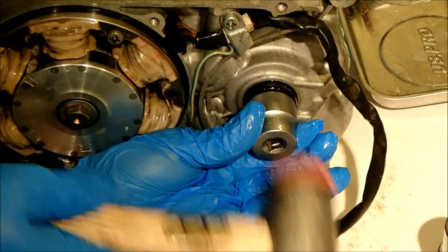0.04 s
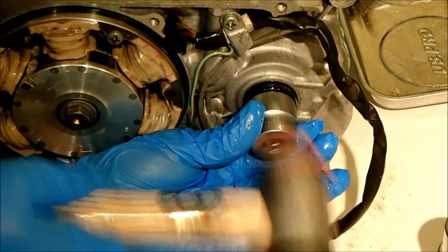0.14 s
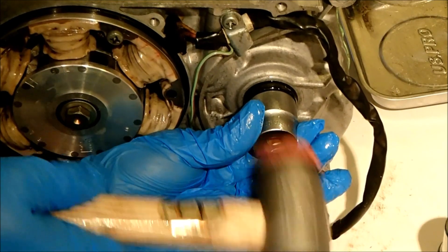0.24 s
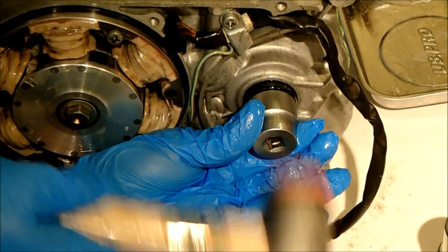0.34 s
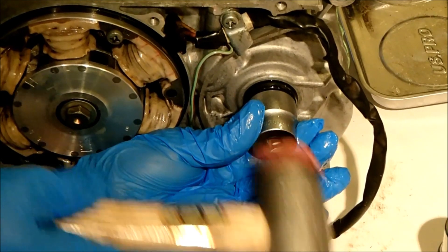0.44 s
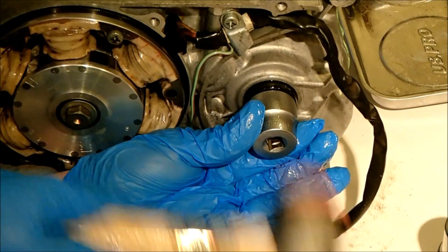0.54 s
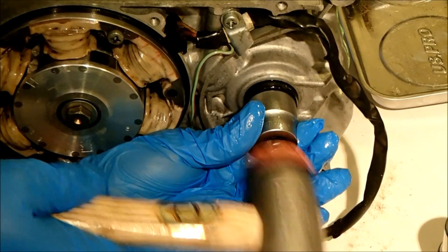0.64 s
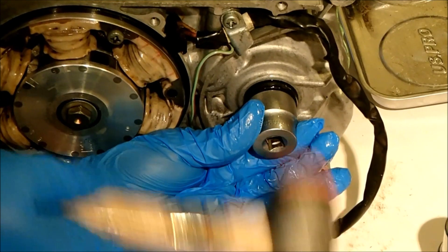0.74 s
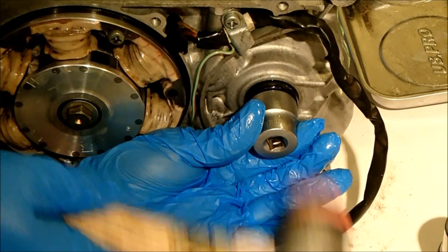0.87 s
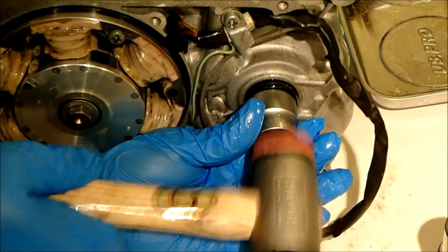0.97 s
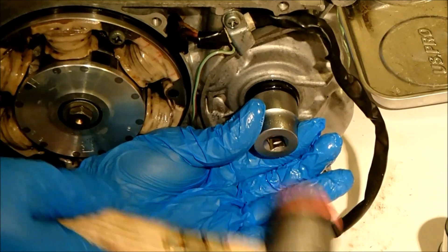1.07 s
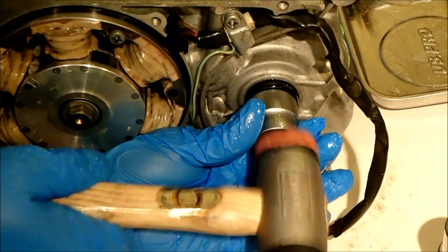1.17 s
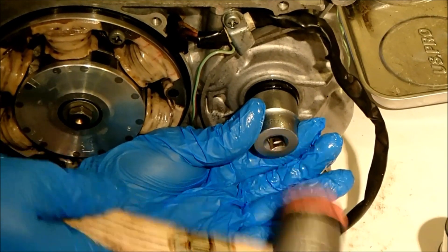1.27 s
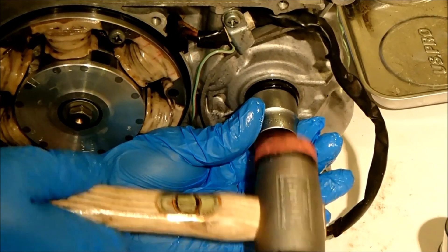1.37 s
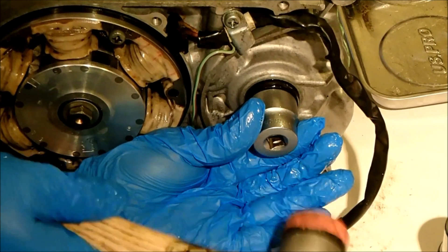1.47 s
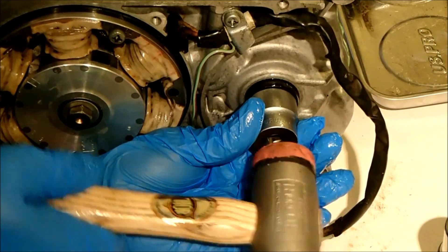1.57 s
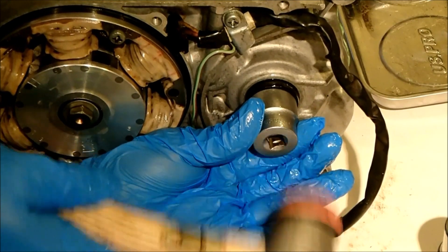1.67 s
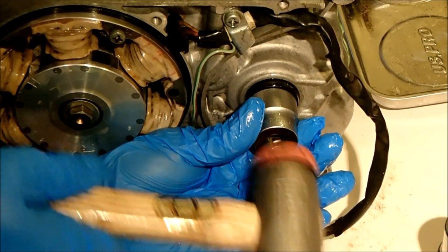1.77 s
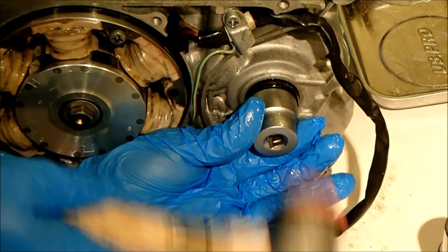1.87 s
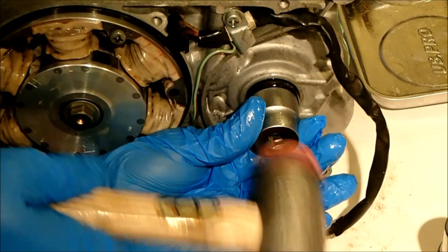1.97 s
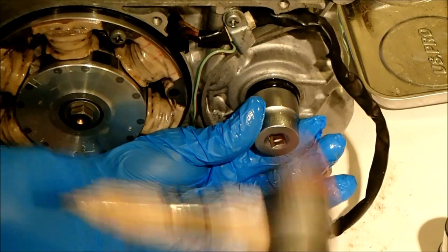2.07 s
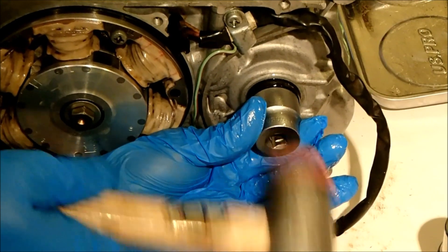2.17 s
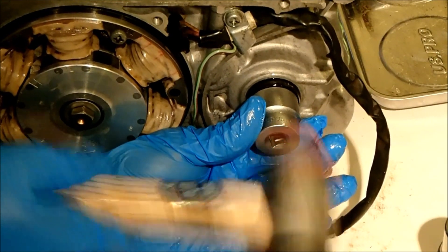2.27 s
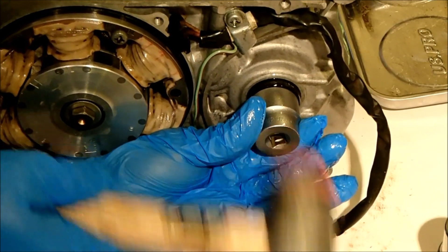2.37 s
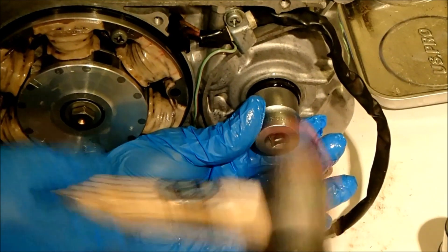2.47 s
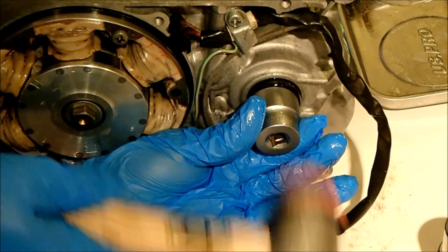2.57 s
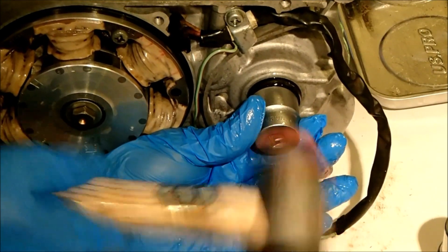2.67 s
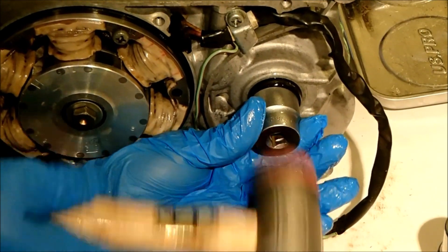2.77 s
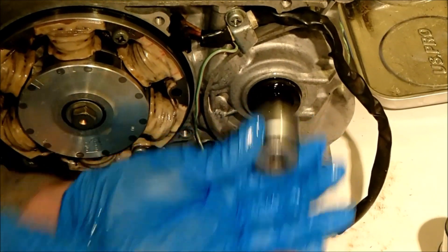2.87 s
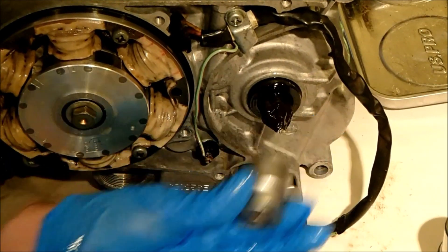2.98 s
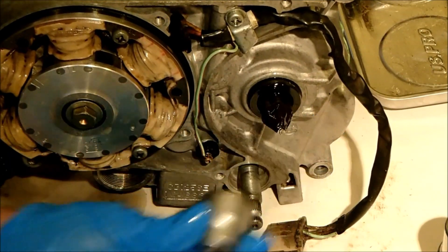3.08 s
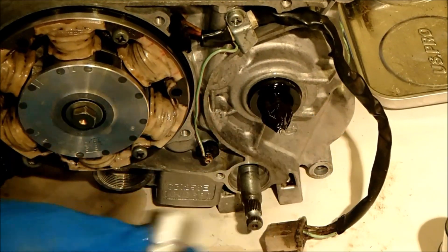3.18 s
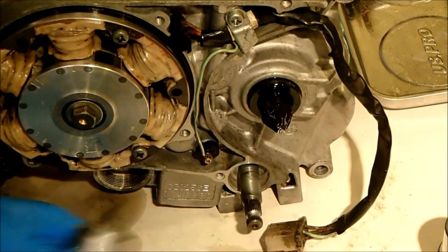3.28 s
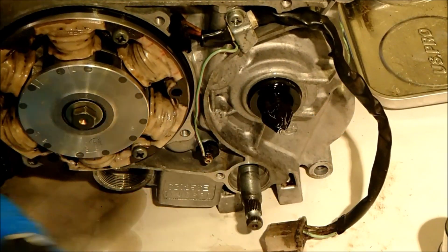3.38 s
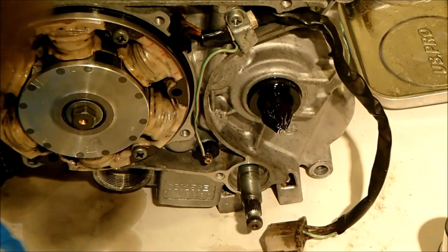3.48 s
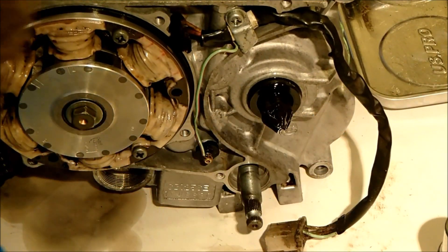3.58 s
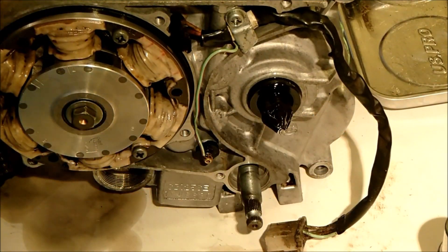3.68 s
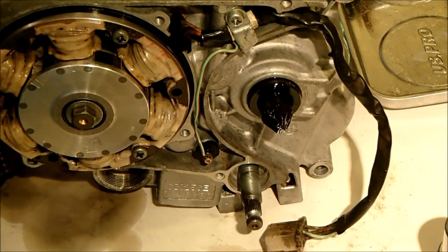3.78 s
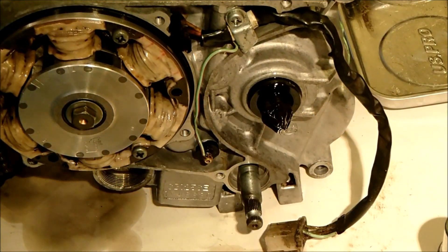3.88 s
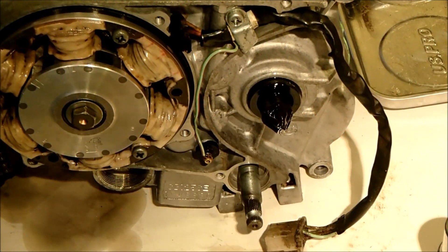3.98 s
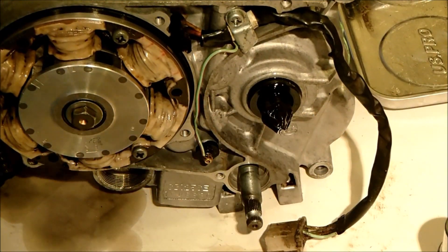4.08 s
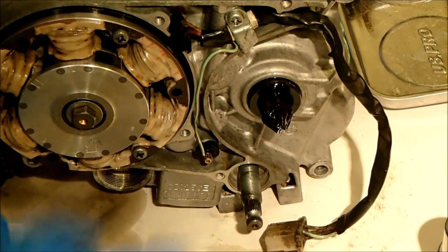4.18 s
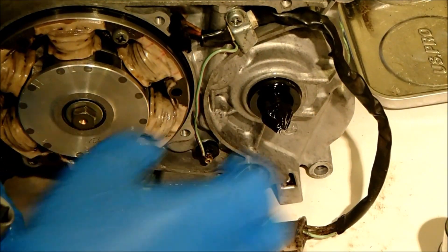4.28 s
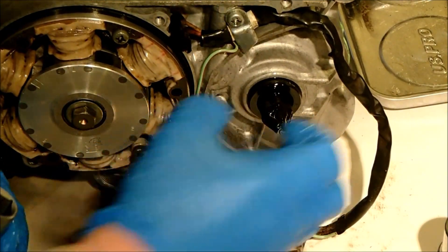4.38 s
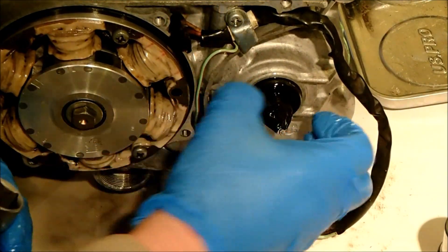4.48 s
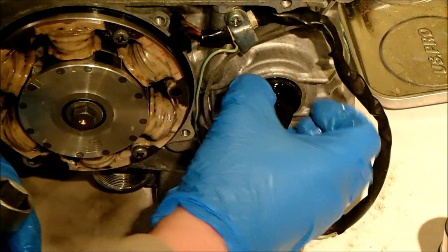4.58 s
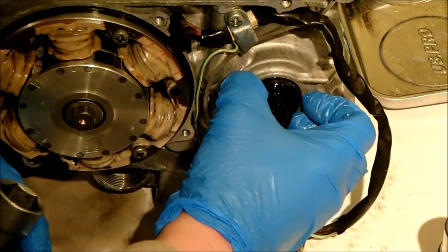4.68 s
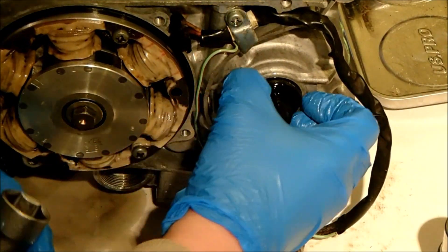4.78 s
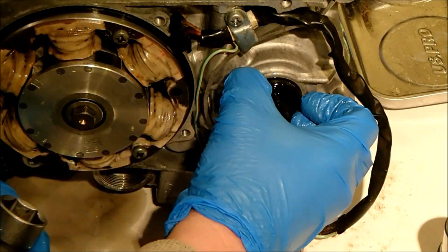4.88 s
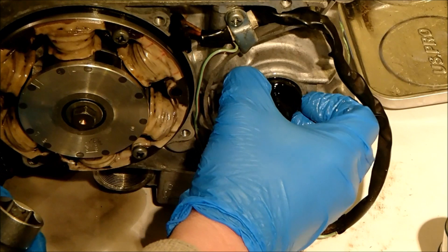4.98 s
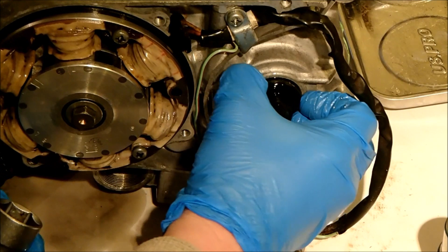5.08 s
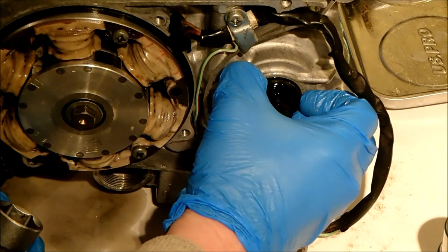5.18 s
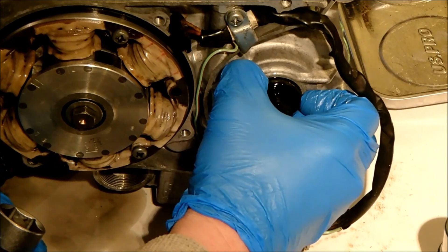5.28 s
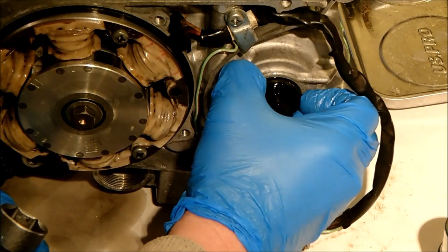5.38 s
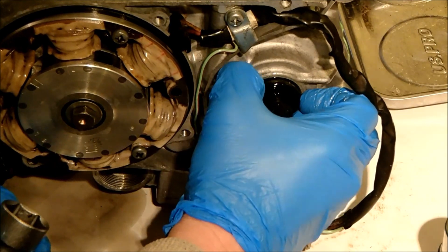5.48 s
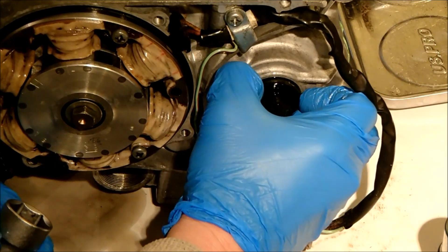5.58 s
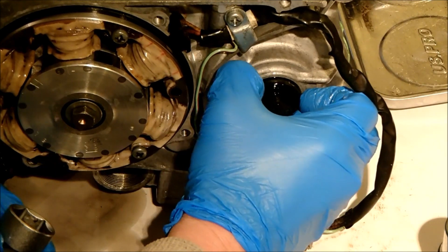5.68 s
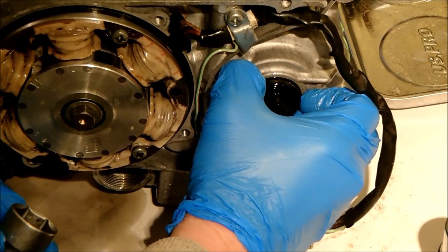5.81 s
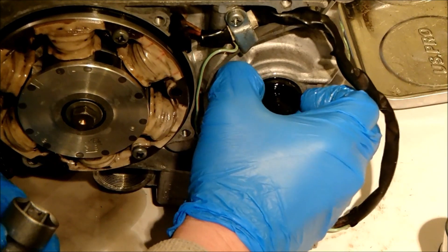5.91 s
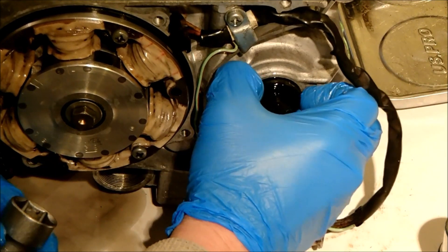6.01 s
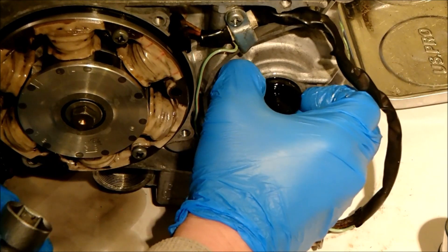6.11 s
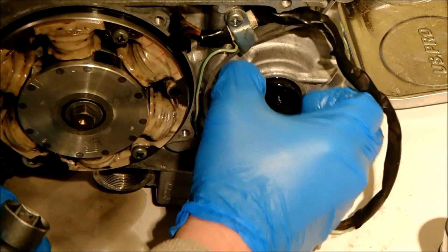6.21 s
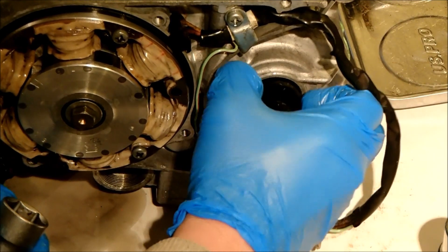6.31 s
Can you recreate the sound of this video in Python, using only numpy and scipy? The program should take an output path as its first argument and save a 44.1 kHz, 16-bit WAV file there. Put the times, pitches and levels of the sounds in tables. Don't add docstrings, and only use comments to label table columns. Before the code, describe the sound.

Close to the microphone in a small workshop, a soft mallet strikes a steel socket about five times a second, each blow a short mid-pitched knock with a steely crack, loose rattle and brief ringing. After nearly three seconds it stops. A mallet is laid on the bench with a tumble of dull, hollow thumps and a short slide. Quiet glove rubs and small ticks follow over soft ventilation hum.

```python
import sys
import numpy as np
from scipy import signal
from scipy.fft import rfft, irfft
from scipy.io import wavfile
from scipy.ndimage import uniform_filter1d, map_coordinates

SR = 44100
rng = np.random.default_rng(int(sys.argv[2]) if len(sys.argv) > 2 else 0)


def store_pcm(level_fs):
    pcm = np.round(np.clip(level_fs, -1, 1) * 32767).astype(np.int16)
    wavfile.write(sys.argv[1], SR, np.atleast_2d(pcm).T)


def invert_db(x):
    u = np.asarray(x, float) / 20
    return 10 ** u


N = 279990
LONG = 2 ** 14
T = np.arange(LONG) / SR
T_SLOW = np.arange(2 * LONG) / SR


def unit(x):
    return x / np.sqrt(np.mean(x ** 2, axis=-1, keepdims=True) + 1e-20)


def along(points, hz):
    f, v = np.transpose(points)
    return np.interp(np.log(hz + 1), np.log(f + 1), v)


def tinted(gain, size):
    spectrum = rfft(rng.standard_normal(size))
    return unit(irfft(spectrum * gain(np.fft.rfftfreq(size, 1 / SR)), size))


def bell(hz, centre_hz, octaves):
    return np.exp(-(np.log2((hz + 1) / centre_hz) / octaves) ** 2)


def wobble(rate):
    knots = rng.standard_normal(int(N * rate / SR) + 4)
    return map_coordinates(knots, [np.arange(N) * rate / SR])


def add(track, s, sound):
    start = round(s * SR)
    room = max(len(sound) + min(start, 0), 0)
    track[max(start, 0):][:room] += sound[max(-start, 0):]


def dying(t, t60, rise=0.00049):
    return invert_db(-60 * t / t60) * (1 - np.exp(-t / rise))


def scatter():
    return rng.normal(0, 1.5)


# t/s, body level/dB, then crack, socket and rattle level/dB against the body
BLOWS = [(0.11, -14.5, -36, -20.5, -3), (0.325, -15.5, -9, -12, 1.5), (0.5267, -15, -5, -2, 4.5),
         (0.7247, -12.5, -7, -6, 0), (0.9205, -13.5, 5.5, -11.5, 10), (1.1222, -14.5, 1, -10.5, 1),
         (1.3089, -14, 1.5, -8, 7), (1.495, -12, -4.5, -8, 2), (1.6768, -14, -3, -13.5, 4),
         (1.8665, -10.5, 0.5, -5.5, 1.5), (2.0502, -12.5, -11, -9, 4.5), (2.244, -13, -3.5, -4, 3.5),
         (2.4436, -11, -7, -7.5, 1.5), (2.6402, -12.5, -4.5, -8, 3)]
EARLIER_BLOW = (-0.085, -15, -10, -8, -3)


def taps():
    out = np.zeros(N + 2 * LONG)
    contact = dying(T, 0.16) / (1 + np.exp(np.clip((T - 0.007) / 0.0023, -50, 50)))
    sway = bench_sway()
    same = answer_bands()
    for s, db, crack_db, socket_db, rattle_db in [EARLIER_BLOW, *BLOWS]:
        body = invert_db(-3) * pressed_knock(socket_db) * contact
        body += case_ring(socket_db) + rattle_and_room(rattle_db, same)
        body += invert_db(rattle_db - 20.5) * pressed_buzz(contact)
        chatter_db = db - 11 + 1.14 * rattle_db
        add(out, s - 0.0032, invert_db(db - 22 + scatter()) * first_touch())
        add(out, s, invert_db(0.91 * db + 1.5) * (sway + tray_song()))
        add(out, s, invert_db(db + 4.5) * body)
        add(out, s, invert_db(db + crack_db + 7) * steel_crack(rattle_db))
        add(out, s, invert_db(chatter_db) * steel_chatter(contact))
    return out[:N]


def socket_tilt(hz, socket_db):
    square = (socket_db - 6) * bell(hz, 1146, octaves=0.17)
    off_centre = 0.9 * (socket_db + 10) * bell(hz, 700, octaves=0.4)
    return square - off_centre


# f/Hz, level/dB
PRESSED_MODES = [(332, -2), (470, -12), (575, -10), (860, -4.5), (1040, 6), (1150, 10.5), (1370, -5),
                 (1600, -5), (1800, -13), (2260, -19.5)]


def pressed_knock(socket_db):
    knock = np.zeros(LONG)
    for hz, level in PRESSED_MODES:
        gain = invert_db(level + socket_tilt(hz, socket_db) + scatter())
        knock -= gain * np.sin(2 * np.pi * hz * rng.normal(1, 0.0058) * T)
    return knock


# f/Hz, level/dB, t60/s
CASE_MODES = [(206, -26.5, 0.32), (277, -34.5, 0.51), (328.2, -3, 0.077), (483, -46, 1), (615, -81, 0.43),
              (866, -24.5, 0.17), (881, -41, 0.086), (1085, -17, 0.22), (1103, -24, 0.13),
              (1370, -21, 0.13), (1586, -13, 0.09), (2010, -41, 0.03)]


def case_ring(socket_db):
    ring = np.zeros(LONG)
    for hz, level, t60 in CASE_MODES:
        gain = invert_db(level + socket_tilt(hz, socket_db) + scatter())
        blur = np.cumsum(rng.standard_normal(LONG)) * 0.0023 / t60
        ring += gain * dying(T, t60, rise=0.0037) * np.sin(2 * np.pi * hz * T + blur)
    return ring


def steel_crack(rattle_db):
    steel_db = 2.2 * rattle_db - 19
    crack = np.zeros(LONG)
    for hz, level in [(2300, 0), (3300, 0), (5600, steel_db)]:
        crack -= invert_db(level) * np.sin(2 * np.pi * hz * rng.normal(1, 0.081) * T)
    return crack * dying(T, 0.004, rise=0.0001)


# f/Hz, level/dB
BUZZ_COLOUR = [(600, 7.5), (1500, 16.5), (4000, -4), (7000, -15), (10000, -1), (16000, -24)]


def pressed_buzz(contact):
    return tinted(lambda f: invert_db(along(BUZZ_COLOUR, f)), LONG) * contact


# f/Hz, level/dB
CHATTER_COLOUR = [(3000, 13), (6000, 0), (9000, -1), (12000, -1.5), (15000, 5), (16600, -20)]


def steel_chatter(contact):
    envelope = 0.62 * contact + dying(T, 0.0087) + 0.22 * dying(T, 0.07)
    return tinted(lambda f: invert_db(along(CHATTER_COLOUR, f)), LONG) * envelope


def first_touch():
    return tinted(lambda f: bell(f, 5300, octaves=0.69), LONG) * dying(T, 0.023)


# f/Hz, level/dB, t60/s
ANSWER = [(250, -24, 0.28), (580, -14.5, 0.12), (1000, -26, 0.28), (1650, -25, 0.068), (3000, -24.5, 0.16),
          (5000, -29, 0.074), (8240, -55.5, 0.62), (13200, -46, 0.25)]
ANSWER_HZ = np.array(ANSWER)[:, :1]


def answer_bands():
    return tinted(lambda f: bell(f, ANSWER_HZ, octaves=0.96) * (f < 15800), LONG)


def rattle_and_room(rattle_db, same):
    fall = np.array([invert_db(db) * dying(T, t60, rise=0.00026) for _, db, t60 in ANSWER])
    share = np.clip(along([(900, 0.43), (2200, 0.24)], ANSWER_HZ), 0, 1)
    bright = np.clip(along([(700, 0.066), (2500, 1)], ANSWER_HZ), 0, 1)
    bands = share * same + np.sqrt(1 - share ** 2) * answer_bands()
    tail = (invert_db(rattle_db * bright) * fall * bands).sum(axis=0)
    lumps = unit(uniform_filter1d(rng.standard_normal(LONG), size=130))
    return tail * unit(invert_db(0.74 * lumps))


# f/Hz, level/dB, t60/s
TRAY_MODES = [(747, -31.5, 0.69), (1746, -36, 0.5)]


def tray_song():
    song = np.zeros(2 * LONG)
    for hz, level, t60 in TRAY_MODES:
        gain = invert_db(level + 2 * scatter())
        shiver = 0.006 * np.cumsum(rng.standard_normal(2 * LONG))
        song += gain * dying(T_SLOW, t60, rise=0.0071) * np.sin(2 * np.pi * hz * T_SLOW + shiver)
    return song


# f/Hz, level/dB, t60/s, build-up/s
BENCH_SWAY = [(50.6, -25, 0.84, 0.082), (64.7, -2.5, 0.22, 0.031), (96.8, -13, 0.45, 0.0081),
              (118.4, -11, 0.24, 0.004), (124.1, -24.5, 1.47, 0.035)]


def bench_sway():
    sway = np.zeros(2 * LONG)
    for hz, db, t60, rise in BENCH_SWAY:
        envelope = invert_db(db - 60 * T_SLOW / t60) * (1 - np.exp(-(T_SLOW / rise) ** 2))
        sway += envelope * np.sin(2 * np.pi * hz * T_SLOW)
    return sway


# t/s, peak level/dB, hardness f/Hz, click level/dB, t60/s
LAID_DOWN = [(3.696, -8.5, 99, -32, 0.17), (3.734, -25.5, 500, 0.5, 0.045), (3.738, 1.5, 476, -49, 0.16),
             (3.807, -6, 250, -39, 0.22), (3.904, -13.5, 494, -11.5, 0.33), (3.914, 0, 470, -51, 0.11),
             (3.975, -5.5, 298, -29, 0.16), (3.998, -8, 250, -28, 0.13), (4.024, -24, 250, -40, 0.3),
             (4.054, -12, 150, -30, 0.102), (4.075, -24, 100, -50, .2), (4.486, -31, 350, -30, 0.16)]
# f/Hz, level/dB, share of the thump's t60 [ratio]
BOARD_MODES = [(83.7, -2.5, 1.62), (170, 1.5, 0.78), (255, 2, 0.84), (302, -16, 0.87), (382, -7, 0.84),
               (480, -3, 0.36), (564, 2.5, 0.35), (708, -1, 1.24), (757, 3, 0.61), (907, -6.5, 1.3)]
# f/Hz, level/dB per Hz
FRICTION_COLOUR = [(600, -5), (1500, -1.5), (4000, -2.5), (8000, -9), (15500, -15.5), (15900, -60)]


def thumps():
    out = np.zeros(N + LONG)
    for s, db, hard_hz, click_db, t60 in LAID_DOWN:
        def reach(f):
            return 1 / (1 + (f / hard_hz) ** 3)

        ring = np.zeros(LONG)
        for hz, level, part in BOARD_MODES:
            gain = invert_db(level + rng.normal(0, 1)) * reach(hz)
            tone = np.sin(2 * np.pi * hz * rng.normal(1, 0.031) * T)
            ring -= gain * dying(T, t60 * part, rise=0.002) * tone
        rumble = tinted(lambda f: reach(f) * (f > 70), LONG) * invert_db(-15) * dying(T, t60, rise=0.003)
        click = tinted(lambda f: invert_db(along(FRICTION_COLOUR, f)), LONG)
        click *= dying(T, 0.033) + 0.24 * dying(T, 0.19)
        push = -np.exp(-((T * hard_hz - 0.8) / 0.35) ** 2) * hard_hz / 450
        thump = invert_db(-3.5) * push + invert_db(-11.5) * ring + rumble + invert_db(click_db) * click
        add(out, s, invert_db(db) * thump)
    return out[:N]


# start t/s, strongest t/s, hiss level/dB, hollow level/dB
STROKES = [
    (3.937, 4.032, -39.5, -44.5),
    (4.226, 4.29, -46, -45.5),
    (4.469, 4.492, -45, -42),
    (4.763, 4.782, -57, -49),
    (4.898, 5.147, -57, -52.5),
    (5.25, 5.34, -53.5, -62),
    (5.332, 5.436, -58, -53),
    (5.46, 5.816, -55.5, -58),
]


def rubs():
    t, hiss, hollow = np.arange(N) / SR, np.zeros(N), np.zeros(N)
    for start, top, hiss_db, hollow_db in STROKES:
        swell_db = 6.5 * np.clip((top - t) / abs(top - start), 0, None)
        fade_db = 188 * np.clip(t - top, 0, None)
        stroke = invert_db(-swell_db - fade_db) * (t > start)
        hiss += invert_db(hiss_db) * stroke
        hollow += invert_db(hollow_db) * stroke
    grain = unit(invert_db(1.7 * wobble(150)))
    skin = tinted(lambda f: invert_db(along(FRICTION_COLOUR, f)), N)
    hand = tinted(lambda f: bell(f, 780, octaves=0.34) + 0.45 * bell(f, 1240, octaves=0.62), N)
    return grain * (hiss * skin + hollow * hand)


# t/s, peak level/dB, pitch f/Hz, t60/s
SMALL_CONTACTS = [(0.318, -30, 4000, 0.07), (0.322, -39, 5000, .02), (.437, -36, 5500, 0.018),
                  (0.84, -37, 5500, .04), (1.42, -37, 5500, 0.036), (0.513, -26, 5060, 0.056),
                  (.522, -17.5, 5000, .03), (2.757, -37, 3980, 0.046), (3.692, -29, 3460, 0.019),
                  (3.843, -41, 5500, 0.034), (3.756, -35, 5200, 0.023), (3.812, -47, 5000, .03),
                  (4.783, -37, 2500, 0.026), (4.96, -41, 4000, .04), (5.13, -42, 1000, .03),
                  (5.2, -37, 3480, 0.025), (5.255, -35.5, 910, 0.052), (6.147, -23.5, 5300, 0.0084),
                  (6.146, -31, 3000, 0.022), (6.146, -33, 1180, 0.1), (6.332, -39, 1000, 0.045)]


def ticks():
    out = np.zeros(N + LONG)
    for s, db, hz, t60 in SMALL_CONTACTS:
        click = tinted(lambda f: bell(f, hz, octaves=1.0), LONG)
        add(out, s, invert_db(db - 6.5) * click * dying(T, t60, rise=0.000086))
    return out[:N]


# t/s, level/dB, t60/s
TREMORS = [
    (2.78, -61, 1.97),
    (4.06, -27, 0.29),
    (4.46, -62, 1.1),
    (6.13, -47, 0.69),
]


def floor_tremor():
    t, tremor = np.arange(N) / SR, np.zeros(N)
    for s, db, t60 in TREMORS:
        tremor += invert_db(db) * dying(np.clip(t - s, 0, None), t60, rise=0.015)
    return tremor * tinted(lambda f: bell(f, 62, octaves=0.44), N)


# f/Hz, level/dB per Hz
AIR_COLOUR = [(25, -19), (70, -7.5), (250, -6.5), (800, -8.5), (2300, -15.5), (6000, -19.5), (15600, -23.5),
              (15900, -106)]
# f/Hz, rms level/dB
FAN_LINES = [(102.3, -56), (161.5, -58), (317.6, -58.5), (479.1, -64), (807.5, -67.5)]


def ventilation():
    t = np.arange(N) / SR
    rush = invert_db(-48.5 + 0.7 * wobble(38)) * tinted(lambda f: invert_db(along(AIR_COLOUR, f)), N)
    hum = np.zeros(N)
    for hz, db in FAN_LINES:
        level = invert_db(db + 3.5 + 1.3 * wobble(14))
        drift = np.cumsum(2.704 * wobble(7.3)) / SR
        hum += level * np.sin(2 * np.pi * (hz * t + drift))
    return rush + hum


def scene():
    return (taps() + thumps() + rubs() + ticks() + floor_tremor() + ventilation())[None]


def low_pass(x):
    return signal.sosfilt(signal.butter(12, 16990, fs=SR, output="sos"), x)


# f/Hz, level/dB
MIC_RESPONSE = [(20, -30), (35, -15), (55, -5), (3600, 1), (4400, -5), (5300, 2), (6500, -4), (8000, -6.5)]


def record(dry):
    hz = np.fft.rfftfreq(N, 1 / SR)
    x = irfft(rfft(dry) * invert_db(along(MIC_RESPONSE, hz)), N)
    x = x / (1 + np.abs(x / 0.95) ** 12) ** (1 / 12)
    x = irfft(rfft(x) * (hz < 16800), N)
    return low_pass(x)


dry = scene()
out = record(dry)
store_pcm(out)
```